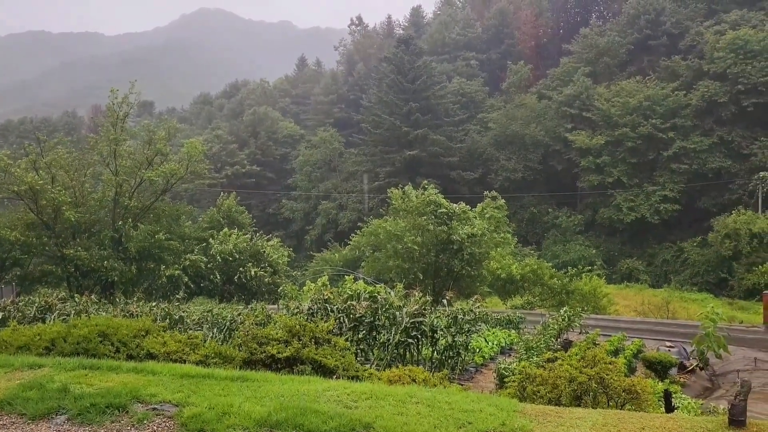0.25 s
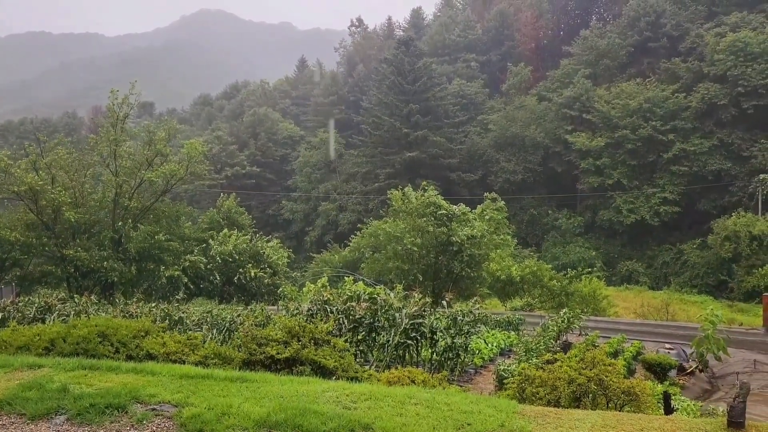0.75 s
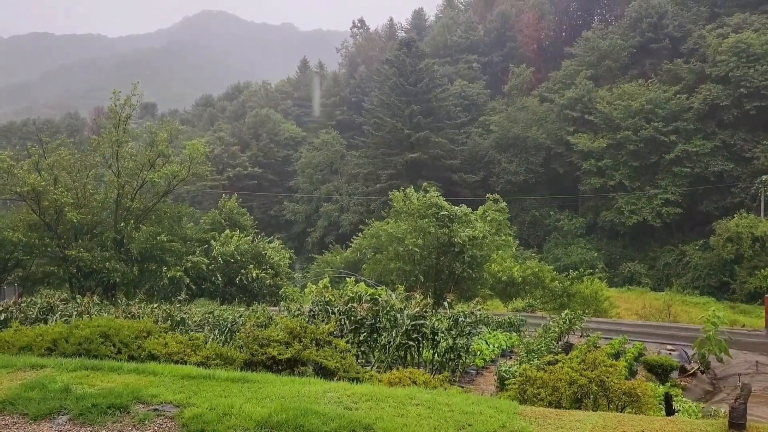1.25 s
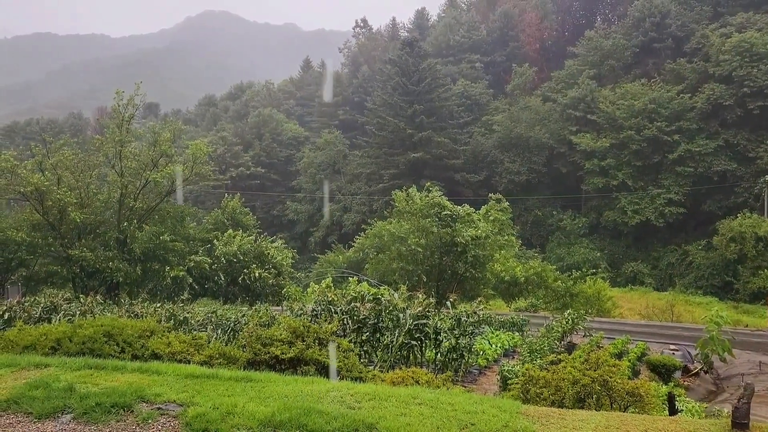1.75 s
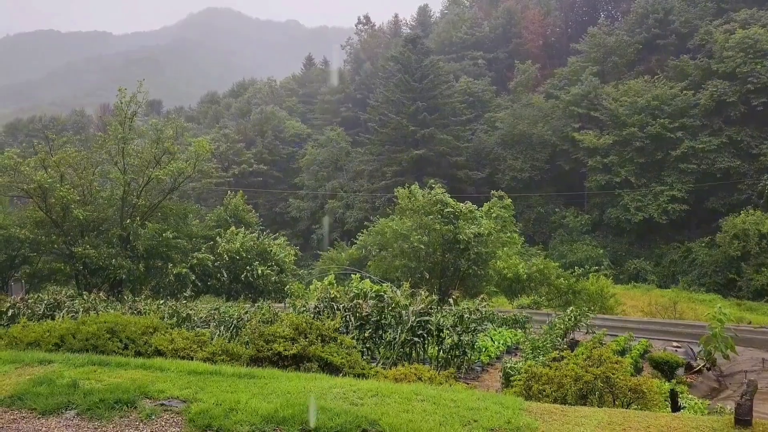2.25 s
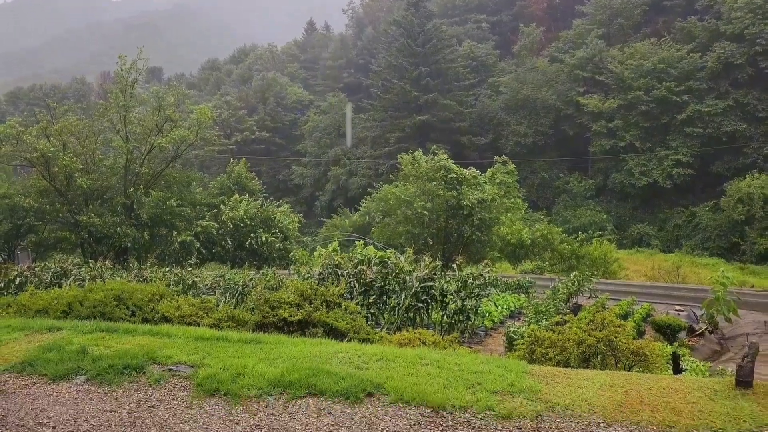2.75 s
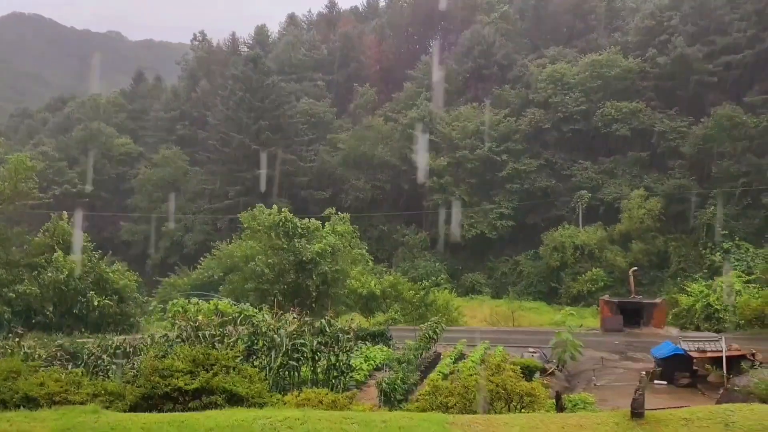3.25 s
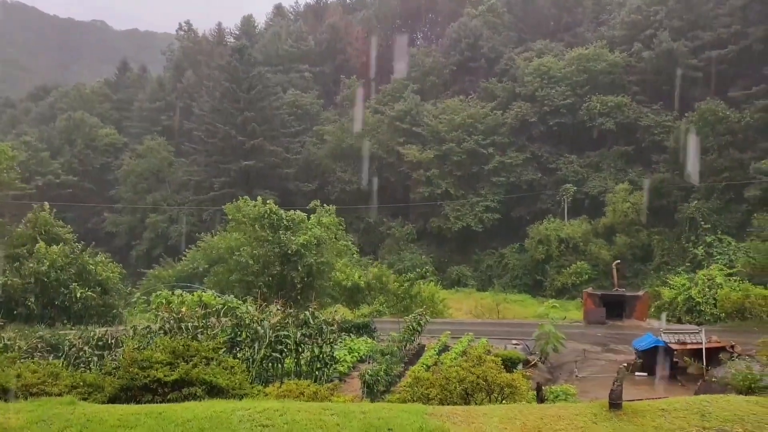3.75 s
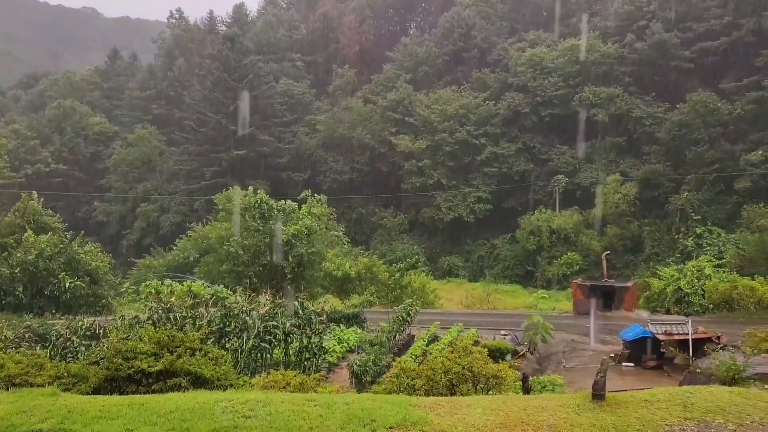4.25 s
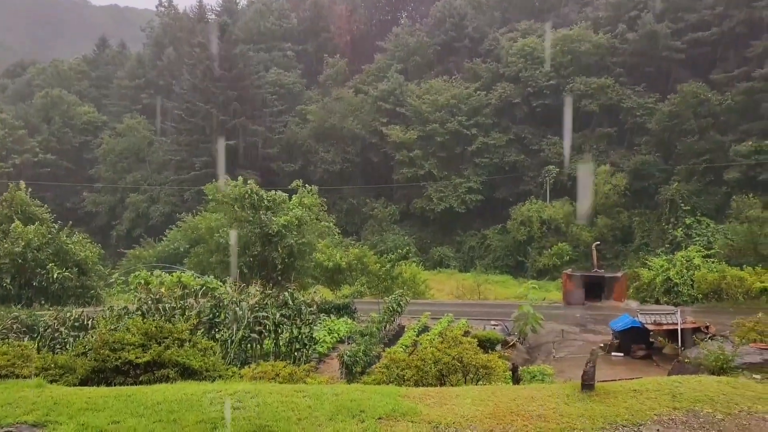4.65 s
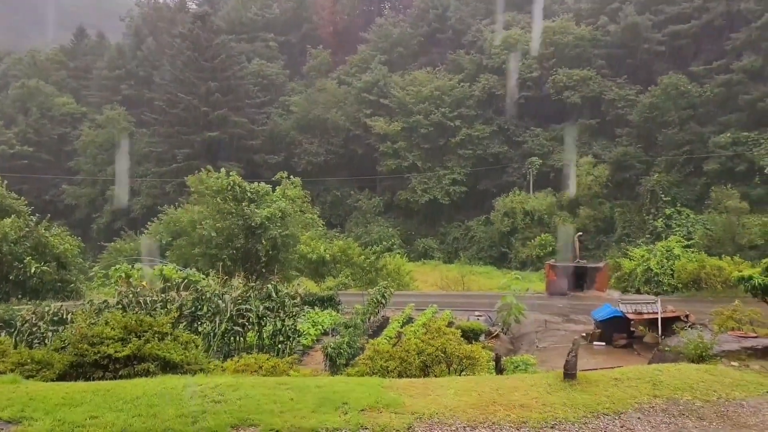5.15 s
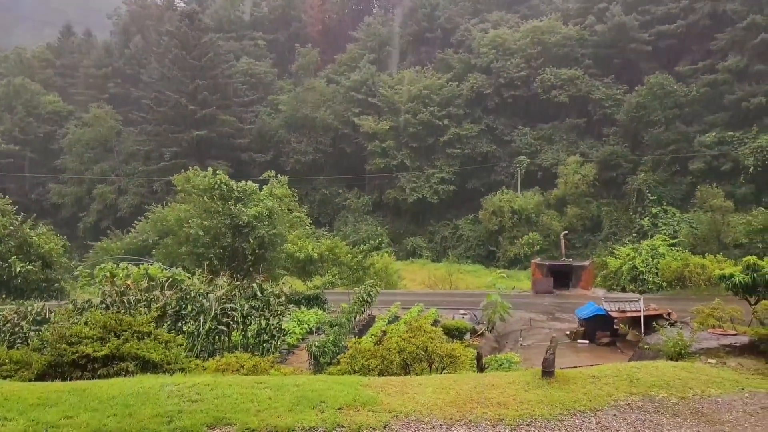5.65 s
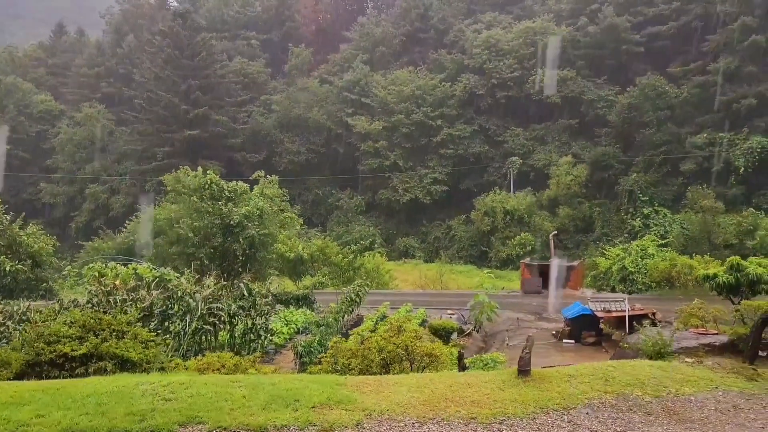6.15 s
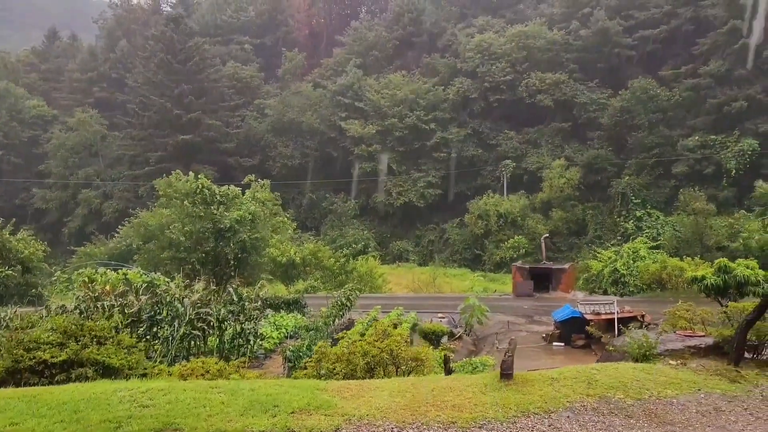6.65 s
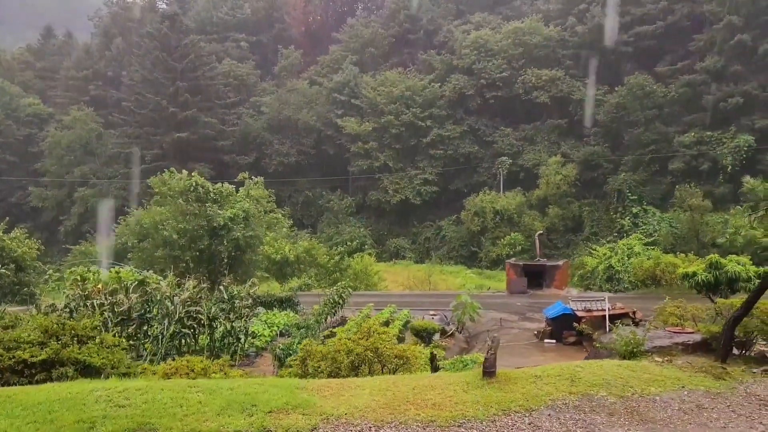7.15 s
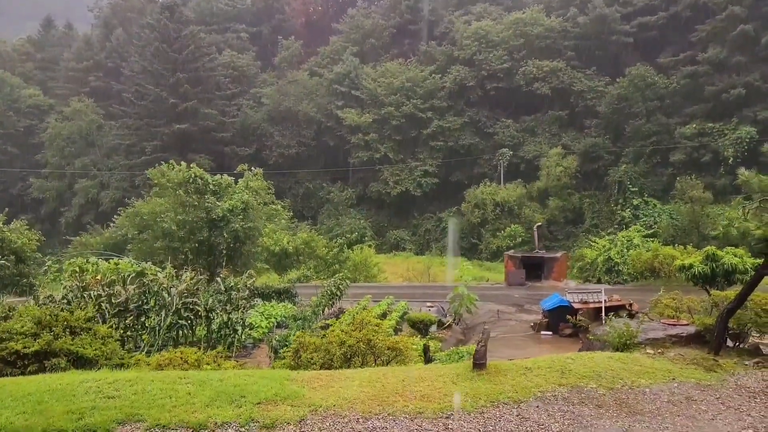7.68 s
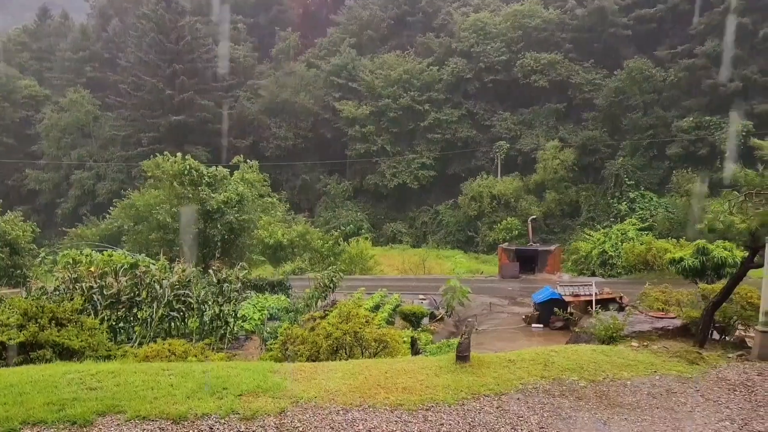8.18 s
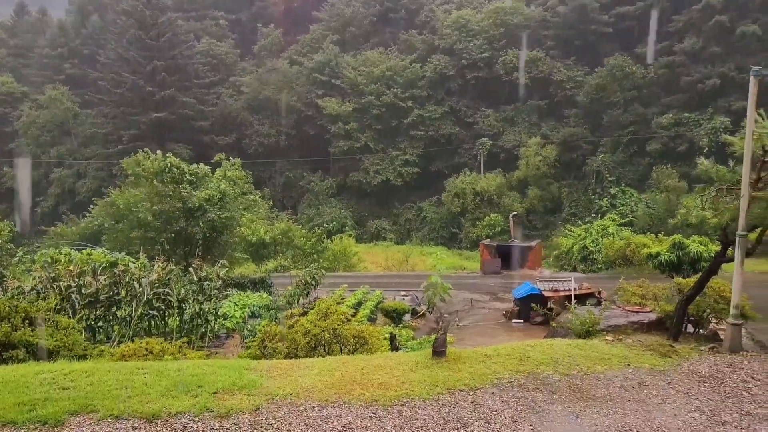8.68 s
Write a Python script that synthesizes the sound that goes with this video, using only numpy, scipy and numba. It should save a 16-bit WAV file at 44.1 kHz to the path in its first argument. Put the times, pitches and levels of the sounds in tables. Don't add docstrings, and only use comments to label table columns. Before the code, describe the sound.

Heavy rain hisses on trees while fat roof drips crack sharply on wet stones, then after three seconds it abruptly turns louder and fuller.

```python
import sys
import numpy as np
from scipy import signal
from scipy.fft import rfft, irfft, next_fast_len
from scipy.io import wavfile
from scipy.ndimage import uniform_filter1d
from numba import njit

SR = 44100
rng = np.random.default_rng(int(sys.argv[2]) if len(sys.argv) > 2 else 0)


def file_out(sig):
    cols = np.atleast_2d(sig).T
    lim = np.clip(cols, -1, 1)
    pcm = np.round(lim * 32767).astype(np.int16)
    wavfile.write(sys.argv[1], SR, pcm)


def linear_from_db(decibels):
    return 10 ** (np.asarray(decibels, float) / 20)


N = 393372

FIRST_ENDS_S, SECOND_STARTS_S = 2.9885, 3.0215
JOIN = round(3.01 * SR)
LOWEST_HZ, HIGHEST_HZ, KINDS = 1300, 15000, 200


# (time [s], peak [dB], pitch [Hz], spray [dB])
LEFT_DRIPS_1 = [(0.0536, -12, 7700, -32.5), (0.2359, -2.5, 7040, -28.5), (0.4681, -9, 8280, -30.5),
                (0.5548, -8, 4180, -30), (0.5973, -5, 6100, -30.5), (0.6831, -17, 9430, -29.5),
                (0.73, -8, 8100, -33), (0.749, -4.5, 6420, -30), (0.9436, -12, 4140, -33),
                (1.0616, -13, 4060, -33), (1.08, -13, 6130, -38), (1.1554, -9, 6960, -33),
                (1.2808, -10, 3790, -30.5), (1.4725, -4.5, 5450, -31), (1.537, -12, 8200, -32.5),
                (1.5816, -10, 6400, -50), (1.7894, -9.5, 7920, -45), (2.0212, -12.5, 6040, -34),
                (2.3788, -11, 4290, -31.5), (2.5743, -4.5, 7280, -45), (2.6567, -14, 5010, -28.5),
                (2.7559, -2.5, 9100, -26.5), (2.9708, -15, 5400, -33)]
LEFT_DRIPS_2 = [(3.7085, -7.5, 1980, -29), (3.9528, -5, 6980, -26), (4.1568, -13, 6060, -25),
                (4.205, -6, 4760, -24), (4.7395, -15, 4020, -28.5), (5.431, -1.5, 4830, -26),
                (5.5637, -5, 3260, -37), (6.389, -8.5, 3760, -28), (6.713, -3.5, 1934, -28.5),
                (6.8977, -4, 2305, -28.5), (7.0733, -6, 1910, -37), (7.2097, -12, 2745, -26.5),
                (7.344, -9, 1960, -26), (7.5438, -4, 4550, -32), (7.5939, -9, 1850, -43),
                (7.6238, -10, 6130, -33), (7.808, -5, 3150, -28), (7.8189, -8, 5100, -33),
                (8.1583, -4, 5650, -26.5), (8.3173, -5, 5500, -45), (8.5274, -7.5, 2326, -29.5),
                (8.6964, -7, 3240, -29), (8.7799, -9, 3420, -34), (8.8758, -9, 7150, -26)]
RIGHT_DRIPS_1 = [(0.2588, -10, 4040, -28.5), (0.5092, -12.5, 2160, -33), (0.641, -16, 9020, -30),
                 (0.8323, -21, 5650, -35), (0.88, -10, 7020, -29.5), (0.982, -8, 3660, -27),
                 (1.3441, -6.5, 6320, -34.5), (1.421, -10.5, 4850, -27.5), (1.4483, -18, 3120, -26),
                 (1.5736, -13, 4370, -30.5), (1.645, -13, 4240, -33.5), (1.7788, -9, 7920, -31),
                 (2.1372, -16, 2125, -35.5), (2.2167, -24, 6150, -29.5), (2.2378, -10, 6100, -32),
                 (2.3234, -16, 2730, -37), (2.4317, -13, 2910, -37), (2.5646, 0, 7120, -24.5),
                 (2.6018, -10.5, 2616, -33), (2.727, -15, 2690, -34), (2.7425, -14, 5820, -28),
                 (2.8285, -12, 5530, -38), (2.8921, -17, 7500, -32.5)]
RIGHT_DRIPS_2 = [(3.1013, -9, 6000, -29), (3.376, -5, 9640, -34), (3.5895, -8, 4630, -26),
                 (3.599, -4.5, 5500, -26.5), (3.8966, -12, 2230, -38), (3.9887, -2, 3860, -22.5),
                 (4.4167, -9, 5440, -24), (4.7945, -9, 6100, -25.5), (4.885, -14, 6540, -26),
                 (4.933, -7, 4830, -30), (5.054, -4, 3580, -32), (5.0938, -5, 6000, -31),
                 (5.212, -4.5, 5770, -30), (5.3101, -9, 4810, -27.5), (5.7484, -7, 6200, -34),
                 (5.849, -8, 2510, -32), (5.9737, -6, 2450, -39), (6.457, -8, 8500, -29),
                 (6.6346, -6, 8240, -31), (6.981, -8, 6770, -29), (7.0306, -14, 4850, -29),
                 (7.5219, -8, 1976, -26), (7.706, -13, 9800, -27), (7.9273, -5.5, 3100, -37),
                 (7.992, -3, 4700, -31), (8.165, -2, 7900, -26.5), (8.223, -4, 8500, -29),
                 (8.437, -8, 3270, -45), (8.6637, -10, 7360, -27)]


def roof_drips():
    stretches = [(LEFT_DRIPS_1, 3), (LEFT_DRIPS_2, 1), (RIGHT_DRIPS_1, -2.5), (RIGHT_DRIPS_2, -5)]
    rows = []
    for drips, stretch_pan_db in stretches:
        s, peak_db, hz, spray_db = np.transpose(drips)
        pan_db = stretch_pan_db + 3 * rng.standard_normal(len(s))
        rows.append(np.c_[s, peak_db, hz, pan_db, spray_db])
    return np.vstack(rows)


# (time [s], peak [dB], pitch [Hz], left-right [dB], spray [dB])
PUDDLE_PLOPS = [(3.1922, -11, 3790, 2.5, -29), (3.243, -16, 3860, 1.5, -26.5),
                (3.4386, -21, 3920, 2.0, -38), (4.354, -24, 3530, 3.0, -29), (4.3844, -15, 3740, 2.0, -32),
                (4.6595, -6, 1800, 3, -31), (4.7666, -16, 2215, 1.5, -31), (4.9838, -6, 3210, 0, -33),
                (5.138, -20, 2464, 7, -27), (5.27, -10, 2940, 4, -40), (6.7897, -19, 4300, 2.0, -44),
                (7.055, -14, 3960, 5, -27.5), (8.257, -10, 2030, 5, -36), (8.2786, -10.5, 1555, 5, -36)]


def puddle_plops():
    return np.array(PUDDLE_PLOPS)


def small_drips(count):
    luck = rng.random((count, 5))
    s = luck[:, 0] * (N / SR - 0.1)
    near_db = near_rain_db()[(s * SR).astype(int)]
    peak_db = near_db + 9 + 5.5 * luck[:, 1]
    hz = 2100 * 2 ** (2.5 * luck[:, 2])
    pan_db = 14 * (luck[:, 3] - 0.4)
    spray_db = near_db - 13 + 11 * luck[:, 4]
    return np.c_[s, peak_db, hz, pan_db, spray_db]


def cracks(drips):
    s, peak_db, hz, pan_db, _ = np.transpose(drips)
    at = np.round(s * SR).astype(int)
    bursts = impacts(hz, 1 * (at > JOIN), octaves=0.63, decay_s=0.0005 * (4000 / hz) ** 0.37)
    bursts /= np.abs(bursts).max(axis=2, keepdims=True)

    pitch_hz = hz[:, None, None]
    cycles = pitch_hz * np.arange(256) / SR
    ring = 1.16 * np.sin(2 * np.pi * cycles) * np.exp(-cycles / 2)
    share = 0.6 / (1 + (pitch_hz / 2200) ** 4)
    bursts = (bursts + share * ring) / (1 + share)

    gains = linear_from_db(peak_db[:, None] - 1.5 + pan_db[:, None] * [0.5, -0.5])
    out = np.zeros((2, N))
    add(out, bursts, at, np.arange(len(s)), gains)
    return out


def sprays(drips, kinds, count):
    s, _, hz, pan_db, spray_db = np.transpose(drips)[:, :, None]
    shape = (len(drips), count)
    late_s = 0.003 * rng.exponential(1, shape) + 0.022 * rng.exponential(1, shape)
    at = np.minimum(((s + late_s) * SR).astype(int), N - 1)

    tick_hz = 4500 * (hz / 4500) ** 0.9 * 2 ** (0.42 * rng.standard_normal(shape))
    place = np.log(tick_hz / LOWEST_HZ) / np.log(HIGHEST_HZ / LOWEST_HZ)
    which = kind_at(place) + KINDS * (s * SR > JOIN)

    gains = sizes(shape, spread_db=2.0, pan_db=6.5) * linear_from_db(-150 * late_s)[..., None]
    kind_energy = np.sum(kinds ** 2, axis=2)
    energy = np.sum(gains ** 2 * kind_energy[which], axis=(1, 2), keepdims=True) / 2
    gains *= np.sqrt(0.038 * SR / energy)
    gains = gains * linear_from_db(spray_db[..., None] + 0.24 * pan_db[..., None] * [0.5, -0.5])
    out = np.zeros((2, N))
    add(out, kinds, at.ravel(), which.ravel(), gains.reshape(-1, 2))
    return out


# (frequency [Hz], level [dB])
NEAR_COLOUR_1 = [(530, -46), (900, -12), (1880, -20), (2200, -9.5), (3490, -9), (5760, -8), (7300, -4.5),
                 (8630, -17.5), (12800, -6), (15400, -19)]
NEAR_COLOUR_2 = [(530, -42), (900, -28), (1110, -6), (2250, 0), (4180, -2), (6880, -3.5), (7570, -1.5),
                 (9950, -8.5), (12200, -1.5), (15400, -4)]


def impacts(hz, take, octaves, decay_s, size=256):
    bins = np.maximum(np.fft.rfftfreq(size, 1 / SR), 10)
    colour_1 = at_hz(NEAR_COLOUR_1, bins) + leaning(LEAN_1, bins)
    colour_2 = at_hz(NEAR_COLOUR_2, bins) + leaning(LEAN_2, bins)
    colour = linear_from_db([colour_1, colour_2])[take]
    shape = np.exp(-0.5 * (np.log2(bins / hz[:, None]) / octaves) ** 2) + 0.047
    noise = rng.standard_normal((len(hz), 2, size))
    noise = irfft(rfft(noise) * shape[:, None] * colour)
    t = np.arange(size) / SR
    attack = 1 - np.exp(-t / 0.00026)
    return noise * attack * np.exp(-t / decay_s[:, None, None])


def droplet_kinds(count):
    hz = np.tile(np.geomspace(LOWEST_HZ, HIGHEST_HZ, count), 2)
    decay_s = 0.00031 + 0.001 * rng.random(2 * count)
    return impacts(hz, np.repeat([0, 1], count), octaves=0.64, decay_s=decay_s)


def kind_at(place):
    return (np.clip(place, 0, 0.999) * KINDS).astype(int)


def sizes(shape, spread_db, pan_db):
    size_db = spread_db * np.minimum(rng.exponential(1, shape), 5)
    side_db = pan_db * rng.standard_normal(shape)
    return linear_from_db(size_db[..., None] + side_db[..., None] * [0.5, -0.5])


@njit
def add(out, bursts, at, which, gains):
    for i in range(len(at)):
        for ear in range(2):
            for j in range(min(bursts.shape[2], out.shape[1] - at[i])):
                out[ear, at[i] + j] += gains[i, ear] * bursts[which[i], ear, j]


# (time [s], level [dB])
NEAR_RAIN = [(0.0, -33.5), (0.75, -35), (0.98, -30), (1.15, -37), (1.4, -38), (1.83, -34), (2.36, -39.5),
             (2.66, -31), (2.76, -46), (2.99, -31.5), (3.02, -26), (3.42, -24.5), (4.41, -25), (6.62, -25),
             (7.03, -27.5), (7.69, -24), (8.25, -31), (8.72, -24.5)]


def near_rain_db():
    s, level_db = np.transpose(NEAR_RAIN)
    return np.interp(np.arange(N) / SR, s, level_db)


def spatter(kinds):
    drops_per_s = 2500 * linear_from_db(3.4 * drift(12.0))
    at = np.flatnonzero(rng.random(N) < drops_per_s / SR)
    place = 0.55 + 0.12 * drift(14.0) + 0.25 * rng.standard_normal(N)
    which = kind_at(place)[at] + KINDS * (at > JOIN)
    ticks = np.zeros((2, N))
    add(ticks, kinds, at, which, sizes(len(at), spread_db=5.0, pan_db=4.0))
    ticks = np.hstack([rms_one(ticks[:, :JOIN]), rms_one(ticks[:, JOIN:])])
    pan_db = by_take(3, -1.5)
    return ticks * linear_from_db(near_rain_db() - 3.5 + pan_db * np.array([[0.5], [-0.5]]))


# (frequency [Hz], density [dB/Hz])
FAR_1 = [(71, -40), (120, -10.5), (360, -6.5), (468, -8.5), (574, -5.5), (1790, -4.5), (2240, -3),
         (2640, -8.5), (5940, -7), (7280, -6), (8570, -16), (12600, -8), (15400, -12.5)]
FAR_2 = [(71, -21), (120, -7.5), (216, -11), (540, -8), (994, -8.5), (1830, -4), (2240, -2), (4380, -0.5),
         (6850, -2.5), (7430, -1), (9880, -7), (12900, -4), (15400, -7.5)]


def far_rain():
    white = rng.standard_normal((2, N))
    first = linear_from_db(-34.37) * coloured(white[:, :JOIN], FAR_1, LEAN_1)
    second = linear_from_db(-24.75) * coloured(white[:, JOIN:], FAR_2, LEAN_2)
    return np.hstack([first, second]) * linear_from_db(0.26 * drift(8.6))


# (frequency [Hz], correlation [-1 to 1])
LIKENESS = [(40, 0.98), (150, 1), (330, 0.8), (700, 0.25), (1300, -0.26), (2600, 0.0077), (9000, -0.0098)]


def coloured(x, spectrum, lean):
    size = next_fast_len(x.shape[1])
    hz = np.maximum(np.fft.rfftfreq(size, 1 / SR), 10)
    mid, side = rfft(x, size)
    alike = np.clip(at_hz(LIKENESS, hz), -1, 1)
    wide = np.sqrt(1 + alike) * mid + np.sqrt(1 - alike) * side * [[1], [-1]]
    db = at_hz(spectrum, hz) + leaning(lean, hz)
    return rms_one(irfft(wide * linear_from_db(db), size)[:, :x.shape[1]])


# (frequency [Hz], difference [dB])
LEAN_1 = [(60, -3), (150, 2.5), (380, 1.5), (950, 2), (2380, -0.5), (5980, 3.5), (15000, 11)]
LEAN_2 = [(60, 0.5), (150, 0.67), (380, 1.6), (950, 2.5), (2380, 1.8), (5980, 3), (15000, -1)]


def leaning(lean, hz):
    port_hz, width_hz, port_db = 7320, 390, 2.7
    ring_db = port_db / (1 + ((hz - port_hz) / width_hz) ** 2)
    return at_hz(lean, hz) * np.array([[0.5], [-0.5]]) + ring_db * np.array([[1], [0]])


def gusts():
    shared, left, right, valley = rng.standard_normal((4, N))
    band = signal.butter(3, [50, 88], "band", fs=SR, output="sos")
    thump = signal.sosfilt(band, shared + 0.3 * np.array([left, right]))
    power = uniform_filter1d(thump[0] ** 2, 1400)
    thump = thump / np.sqrt(power + 0.15 * np.mean(thump ** 2))
    low = signal.butter(2, [24, 75], "band", fs=SR, output="sos")
    rumble = signal.sosfilt(low, valley + 0.25 * np.array([1.2 * right, left]))
    return rms_one(thump) * gust_swell() + rms_one(rumble) * linear_from_db(by_take(-56.5, -54.5))


# (peak time [s], peak [dB], rise [s])
GUSTS = [(0.45, -37.5, 0.042), (0.8, -53, 0.044), (0.96, -51, .03), (1.24, -60, .05), (1.43, -50, .06),
         (1.96, -57, .04), (2.43, -54, .05), (3.13, -44, .09), (3.31, -40, .05), (3.49, -37, 0.046),
         (3.7, -57, .15), (4.18, -49, .04), (4.6, -51, .1), (4.86, -52, .06), (5.03, -50, 0.035),
         (5.47, -49, 0.22), (5.83, -46, .03), (6.07, -51, 0.082), (6.3, -49, .14), (6.69, -52, .04),
         (6.8, -47, 0.056), (7.07, -55, .05), (7.45, -53, .1), (7.67, -48, 0.056), (8.06, -49, .05),
         (8.3, -53, 0.12), (8.68, -48, .08), (8.84, -41, 0.015)]


def gust_swell():
    t = np.arange(0, N, 64) / SR
    s, peak_db, rise_s = np.transpose(GUSTS)[:, :, None]
    width_s = rise_s * np.where(t < s, 1, 0.7)
    bells = linear_from_db(peak_db) * np.exp(-((t - s) / width_s) ** 2)
    breeze = linear_from_db(by_take(-72, -57.5))
    return np.interp(np.arange(N) / SR, t, bells.sum(axis=0)) + breeze


def by_take(first, second):
    return np.repeat([first, second], [JOIN, N - JOIN])


def rms_one(x):
    return x / np.sqrt(np.mean(x ** 2) + 1e-20)


def at_hz(points, hz):
    point_hz, value = np.transpose(points)
    return np.interp(np.log(hz), np.log(point_hz), value)


def drift(rate_hz):
    r = np.exp(-80 * np.pi * rate_hz / SR)
    white = rng.standard_normal(N // 40 + 2002)
    slow = signal.lfilter([1], [1, -2 * r, r * r], white)[2000:]
    return np.interp(np.arange(N) / 40, np.arange(len(slow)), rms_one(slow))


def scene():
    kinds = droplet_kinds(KINDS)
    drips = np.vstack([roof_drips(), puddle_plops(), small_drips(count=260)])
    return cracks(drips) + sprays(drips, kinds, count=170) + spatter(kinds) + far_rain() + gusts()


def band_limit(x):
    return signal.sosfilt(signal.butter(12, 16850, fs=SR, output="sos"), x)


def record(dry):
    t = np.arange(N) / SR
    first = np.clip((FIRST_ENDS_S - t) / 0.0018, 0, 1)
    remnant = linear_from_db(-31.5) * (t < FIRST_ENDS_S + 0.014)
    second = np.clip((t - SECOND_STARTS_S) / 0.0024, 0, 1)
    top_cut = signal.ellip(12, 0.5, 50, 15500, fs=SR, output="sos")
    mix = (first + remnant + second) * signal.sosfilt(top_cut, np.clip(dry, -1, 1))
    return band_limit(mix)


dry = scene()
out = record(dry)
file_out(out)
```